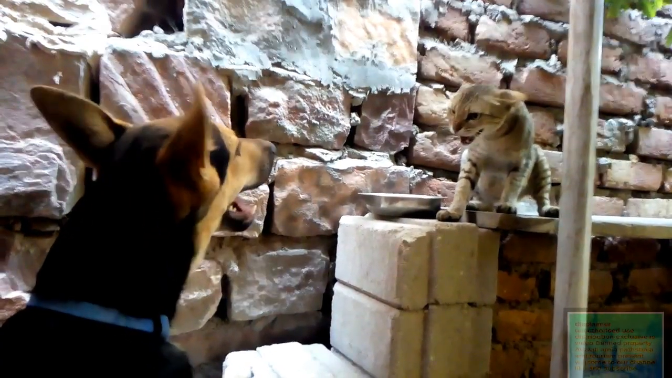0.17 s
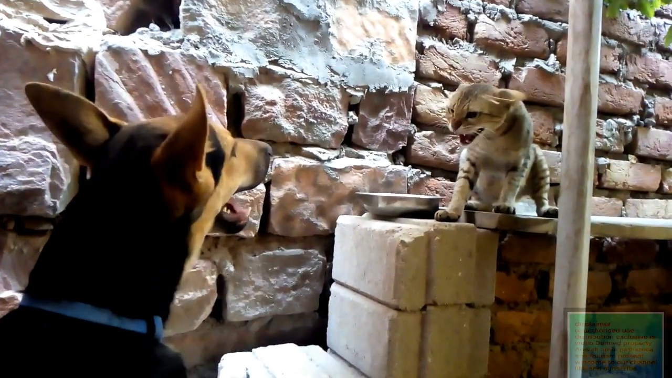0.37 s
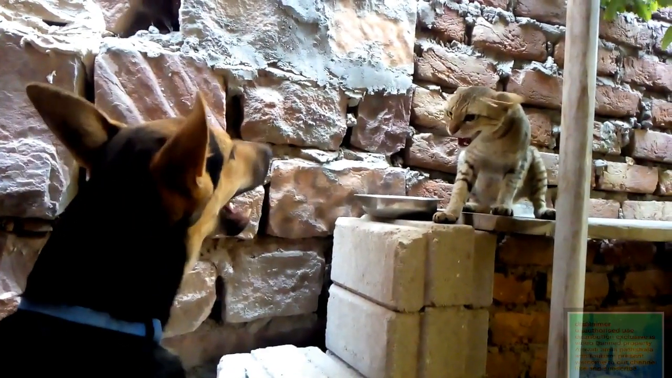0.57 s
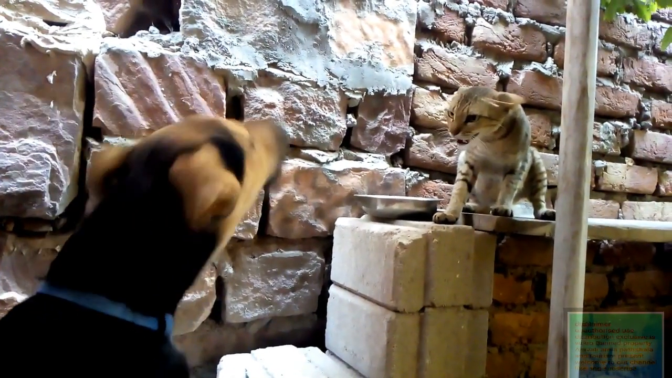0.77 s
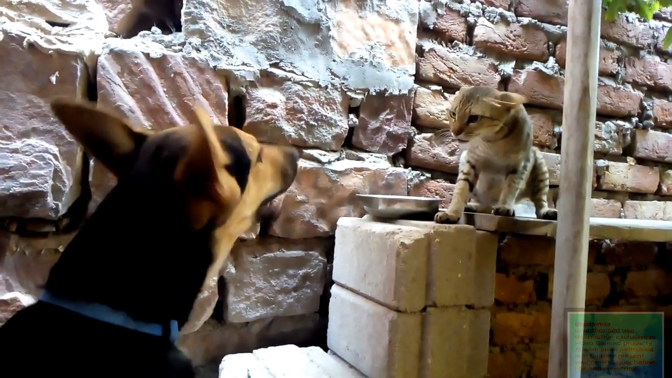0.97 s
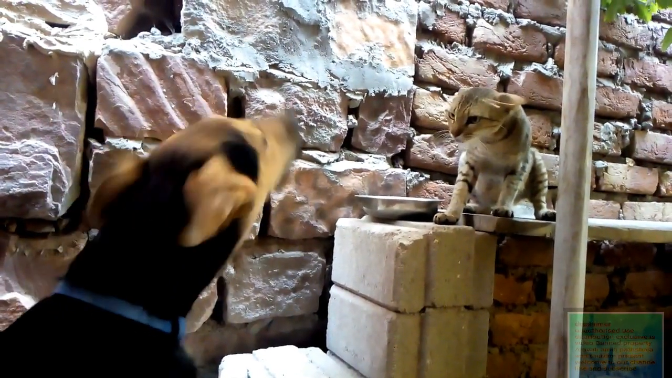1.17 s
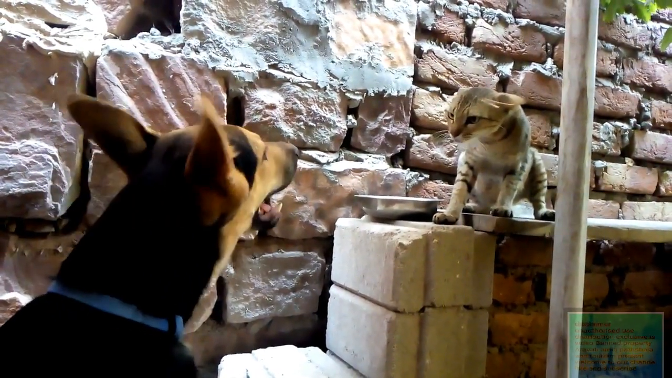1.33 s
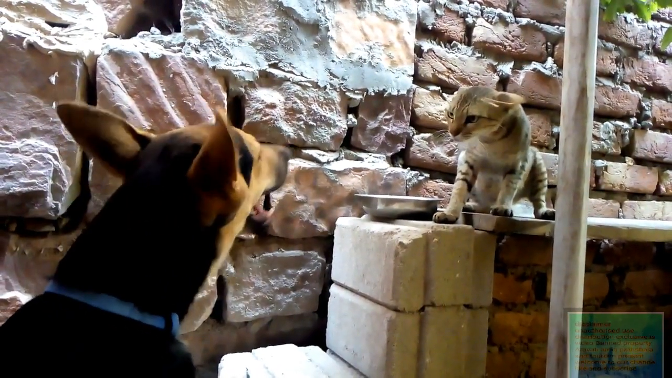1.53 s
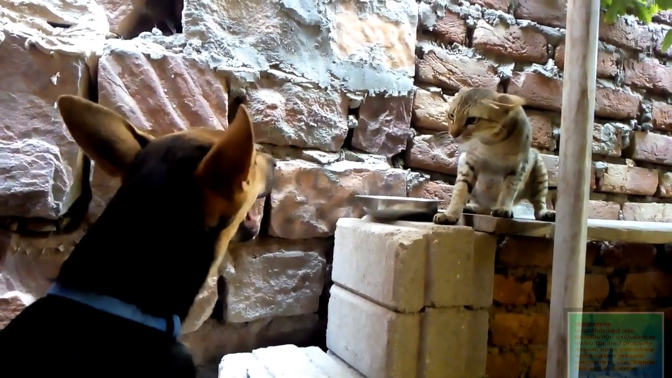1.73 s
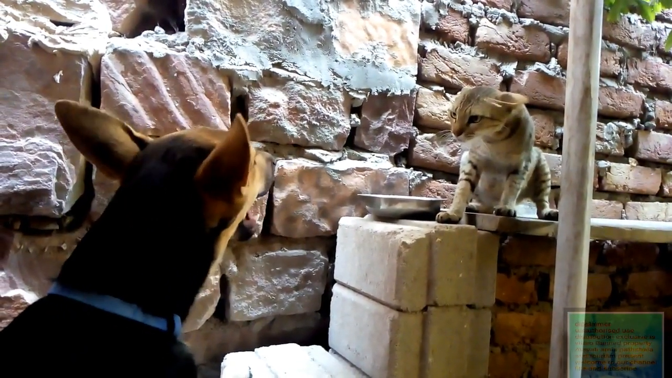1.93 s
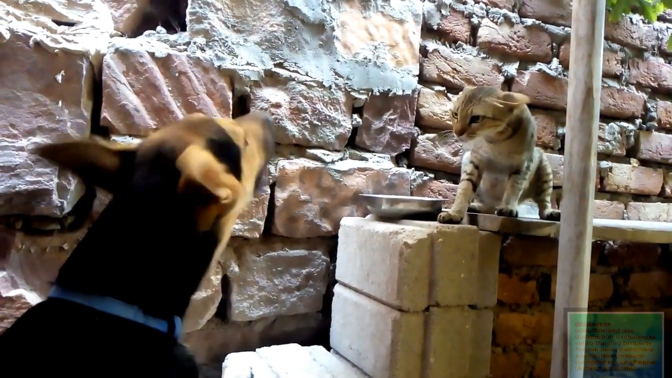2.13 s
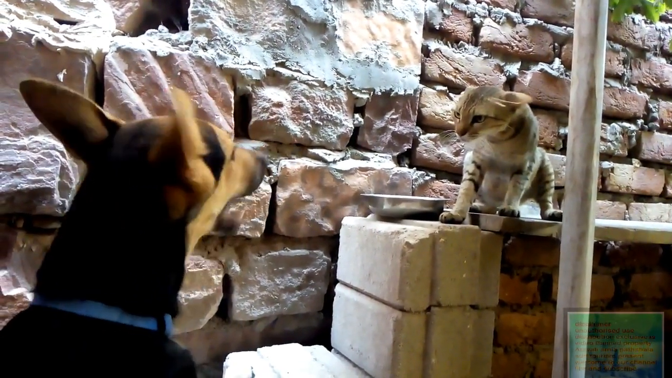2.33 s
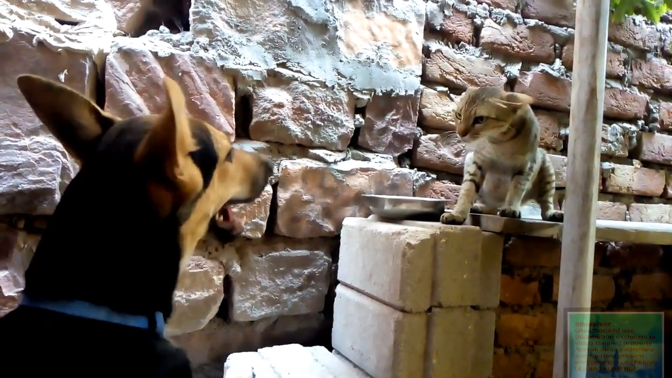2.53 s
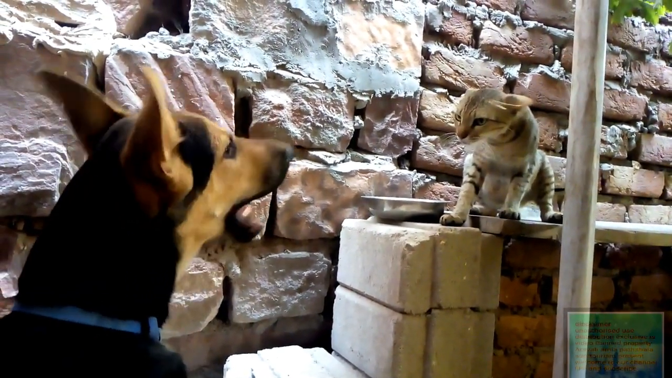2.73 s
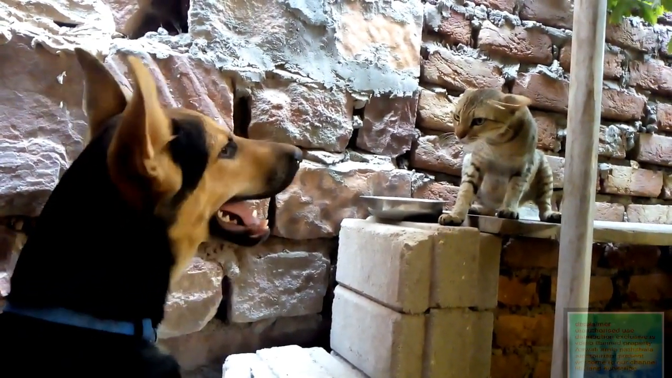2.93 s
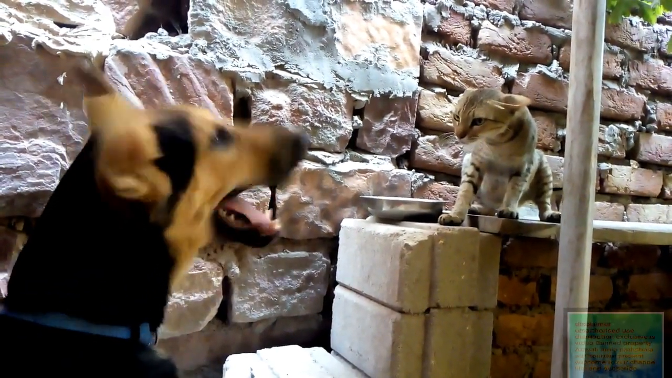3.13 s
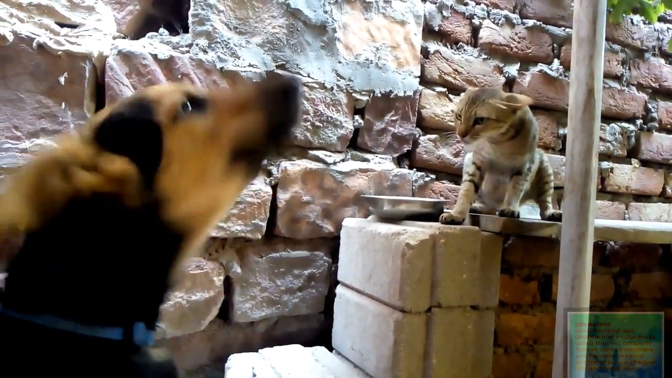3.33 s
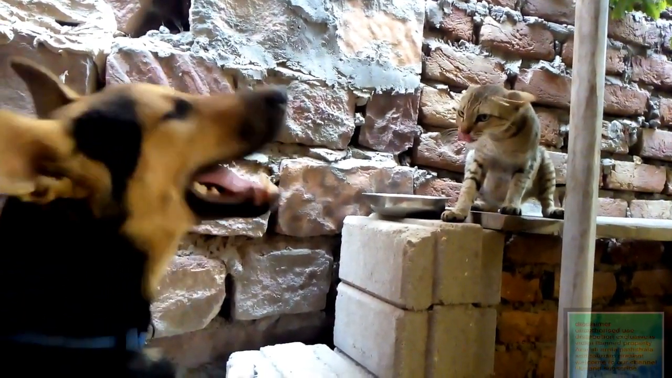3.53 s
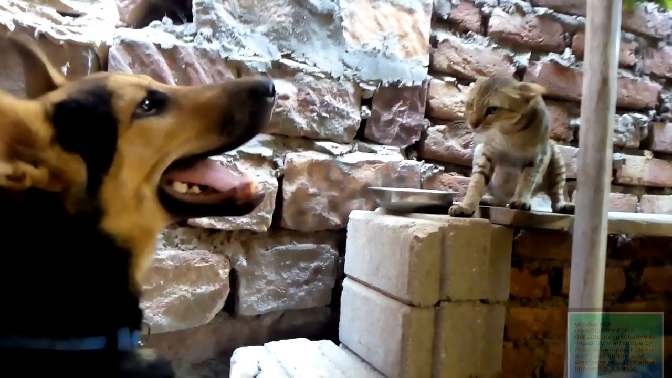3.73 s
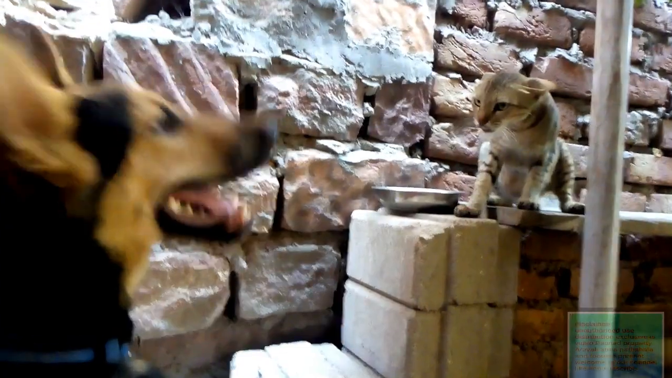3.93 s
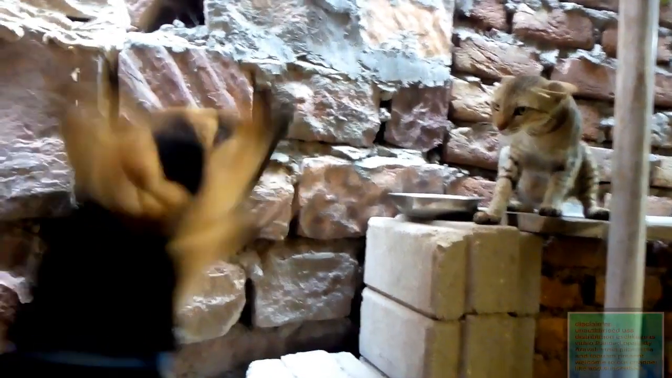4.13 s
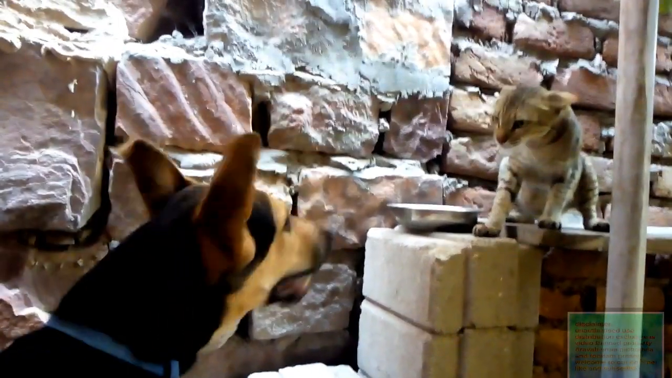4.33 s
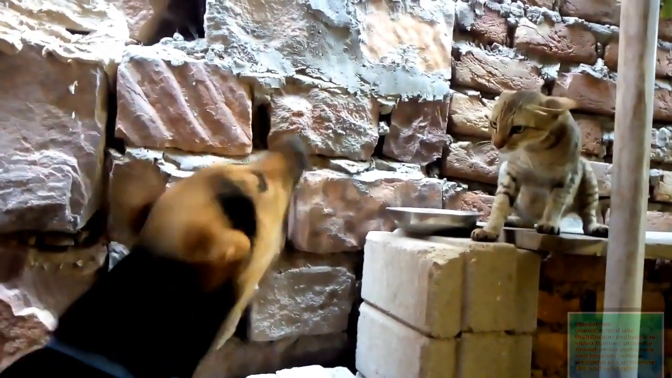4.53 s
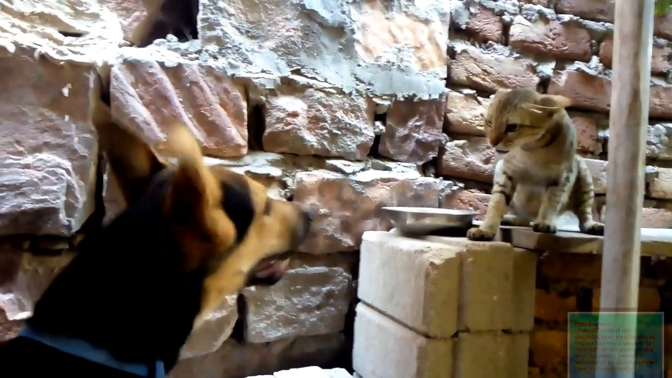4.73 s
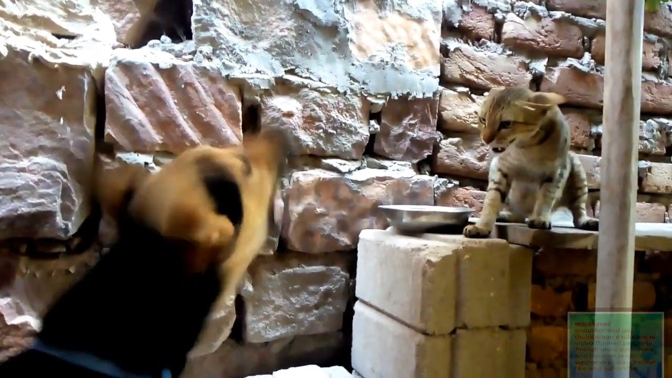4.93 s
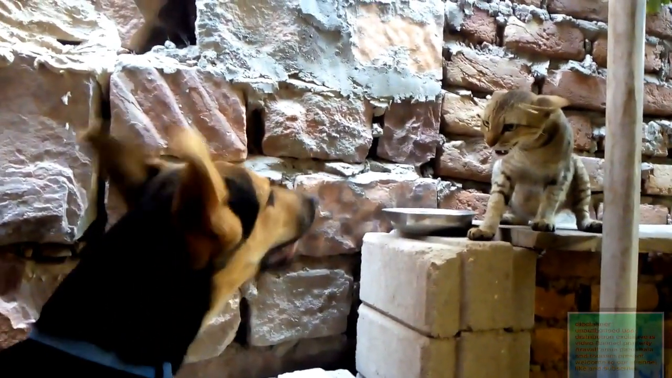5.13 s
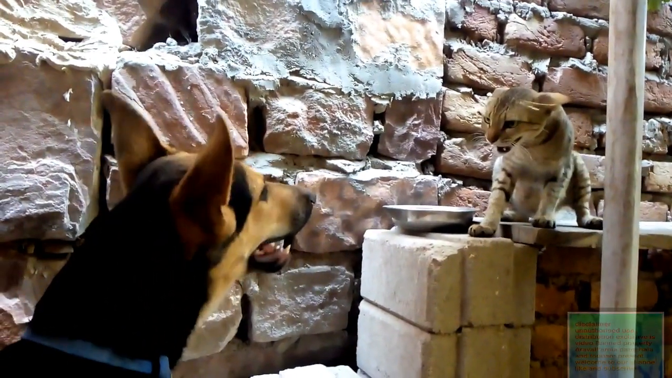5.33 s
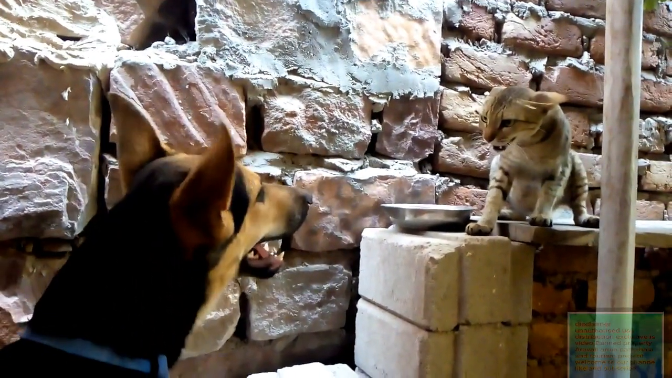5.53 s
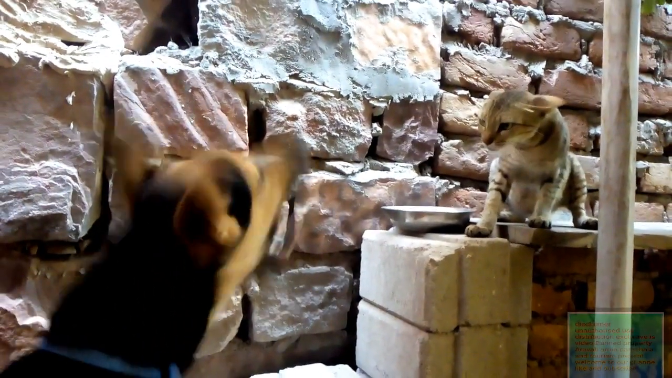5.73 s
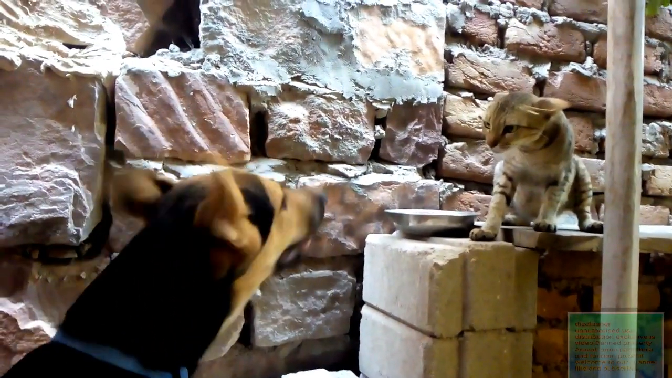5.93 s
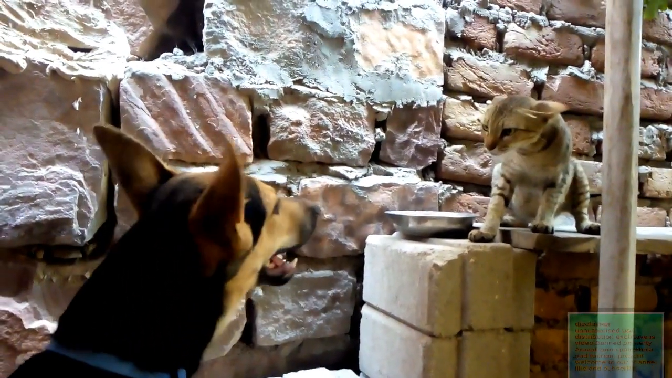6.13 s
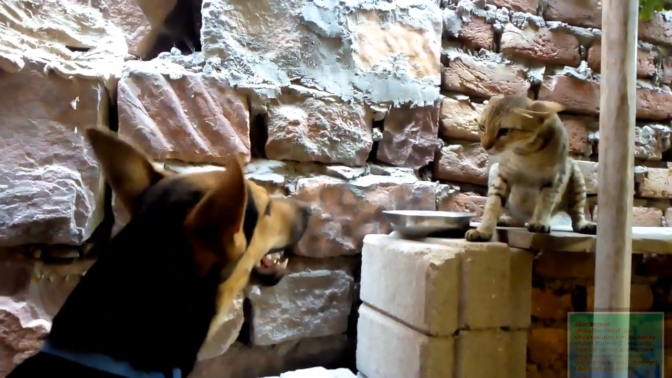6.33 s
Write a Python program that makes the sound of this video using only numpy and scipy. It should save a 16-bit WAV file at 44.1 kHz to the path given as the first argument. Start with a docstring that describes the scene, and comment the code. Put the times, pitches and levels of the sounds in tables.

```python
"""A faint town hum and a panting dog; then the dog barks at a cat in a brick-walled yard.
Each bark is a short cry, clear or hoarse and mostly rising: overtones shaped by mouth and throat.
The walls throw barks back for about a quarter second, as scattered echoes that grow duller.
The cat answers with a thin, drawn-out yowl: clean overtones through a nasal resonance.
Between barks the dog pants in bursts of coloured noise. A limiter holds the loudest barks down."""
import sys
import numpy as np
from scipy import signal
from scipy.fft import rfft, irfft, next_fast_len
from scipy.io import wavfile

SR = 44100
rng = np.random.default_rng(int(sys.argv[2]) if len(sys.argv) > 2 else 0)


def bounce(signal):
    """Save signal as a 16-bit WAV file at the path given by the first command-line argument."""
    frames = np.transpose(np.atleast_2d(signal))
    limited = np.clip(frames, -1, 1)
    pcm = np.round(limited * 32767).astype(np.int16)
    wavfile.write(sys.argv[1], SR, pcm)


def level_to_linear(level):
    """Convert decibel levels to linear amplitude factors, elementwise."""
    exponent = np.asarray(level, float) / 20
    return 10 ** exponent


N = 281358


def curve(rows, at):
    """Columns of a table read at the times given."""
    s, *columns = np.transpose(rows)
    return [np.interp(at, s, column) for column in columns]


def wobble(hz, shape):
    """Low-passed noise of spread 1."""
    noise = signal.sosfilt(signal.butter(2, hz, fs=SR, output="sos"), rng.standard_normal(shape))
    return noise / noise.std()


def peak(hz, centre_hz, width_hz):
    """Gain of one resonance, 1 on top."""
    return 1 / np.sqrt(1 + ((hz ** 2 - centre_hz ** 2) / (hz * width_hz)) ** 2)


def coloured(spectrum, alike):
    """Stereo noise with the given spectrum, partly shared by both sides; rms 1."""
    size = next_fast_len(N, True)
    hz = np.fft.rfftfreq(size, 1 / SR) + 1
    white = rng.standard_normal((3, size))
    shared, separate = white[0], white[1:]
    sides = np.sqrt(np.clip(alike, 0, 1)) * shared + np.sqrt(np.clip(1 - alike, 0, 1)) * separate
    points = np.array(spectrum)
    gain = level_to_linear(np.interp(np.log(hz), np.log(points[:, 0]), points[:, 1]))
    out = irfft(rfft(sides) * gain, size)[:, :N]
    return out / out.std()


def spans(tables, edge_s):
    """Sample range, fade and columns for each table; a sound cut by the end does not fade out."""
    for rows in tables:
        at = np.arange(round(rows[0][0] * SR), min(N, round(rows[-1][0] * SR)))
        since_start = at - at[0]
        until_end = at[-1] - at + (at[-1] == N - 1) * SR
        fade = np.clip(np.minimum(since_start, until_end) / (edge_s * SR), 0, 1)
        yield at, fade, curve(rows, at / SR)


def town_hum():
    """Steady coloured noise, nearly the same on both sides, drifting slowly in level."""
    # tone of the hum: frequency_hz, relative density_db (per Hz)
    hum_spectrum = [(15, -32.5), (25, -12.5), (75, 7), (383, -7.5), (573, -7), (1000, -22), (2240, -23),
                    (3440, -43.5), (6200, -32.5), (9520, -41), (15000, -44)]
    # drift of the hum: time_s, level_db
    hum_drift = [(0.0, -58.5), (1.0, -54.5), (1.8, -61.5), (3.9, -62.5), (4.85, -54), (5.4, -63),
                 (6.38, -59.5)]
    level_db, = curve(hum_drift, np.arange(N) / SR)
    return level_to_linear(level_db) * coloured(hum_spectrum, alike=0.93)


def panting():
    """Air rushes and flutters through the open mouth; hiss swells late as the mouth narrows."""
    # breaths: start_s, length_s, level_db at the start, hiss_db over the teeth
    pants = [(0.064, 0.5, -60.5, -70.5), (1.658, 0.29, -62.5, -92), (2.347, 0.13, -65.5, -86),
             (3.755, .17, -62.5, -66), (5.367, .24, -62.5, -92), (6.351, .1, -55.5, -79.5)]
    # tone of the air: frequency_hz, relative density_db (per Hz)
    breath_spectrum = [(180, -42.5), (300, 2), (629, 4.5), (746, 8), (1030, 0.5), (2200, -1), (3940, -13.5),
                       (6580, -22.5), (9000, -27), (11700, -64), (19800, -120)]
    # tone of the hiss over the teeth: frequency_hz, relative density_db (per Hz)
    teeth_spectrum = [(2500, -31), (4000, -3), (6500, 1), (9000, -15.5), (16000, -52)]
    attack_s, release_s, sag_db_per_s = 0.0083, 0.042, 1.5
    air = coloured(breath_spectrum, alike=0.071) * level_to_linear(1.8 * wobble(22, N))
    hiss = coloured(teeth_spectrum, alike=0.28)
    effort, narrowing = 0, 0
    for start_s, length_s, level_db, hiss_db in pants:
        t = np.arange(N) / SR - start_s
        edges = np.clip(np.minimum(t / attack_s, (length_s - t) / release_s), 0, 1)
        effort = effort + level_to_linear(level_db - sag_db_per_s * t) * edges
        narrowing = narrowing + level_to_linear(hiss_db) * np.sin(np.pi * np.clip(t / length_s, 0, 1) ** 1.6) ** 2
    return air * effort + hiss * narrowing


def tract(hz, mouth_hz, upper_db, shorten, mouth_db=0):
    """Power gain of mouth and throat resonances."""
    # upper resonances of the dog's throat: centre_hz and width_hz (centre before shortening), level_db
    throat_peaks = [(1226, 570, -4.5), (2048, 410, -4), (2440, 150, -4.5), (2670, 180, -16),
                    (4500, 920, -35), (6200, 2100, -33.5)]
    power = level_to_linear(2 * mouth_db) * peak(hz, mouth_hz, width_hz=250) ** 4
    for centre_hz, width_hz, level_db in throat_peaks:
        gain = level_to_linear(level_db + upper_db) * peak(hz, centre_hz * shorten, width_hz) ** 2.36
        power = power + gain ** 2
    return power


def dog():
    """Vocal folds feed overtones to the tract; hoarseness shakes pitch, smears them and adds rasp."""
    # each bark's cry: time_s, pitch_hz, level_db
    barks = [
        [(.52, 424.6, -49), (.538, 445.8, -18.5), (.56, 589.3, -12), (.58, 736.1, -9), (.6, 756.8, 5),
         (.615, 707.7, 6.5), (.655, 640, -3), (.668, 656, -44)],
        [(.942, 428.3, -47.5), (.96, 438.5, -17.5), (.98, 602.3, -11), (1.0, 633, -6), (1.02, 664.7, 6.5),
         (1.055, 638, 6), (1.07, 596, -3.5), (1.085, 532, -14)],
        [(1.968, 430.8, -42), (1.985, 442.8, -11.5), (2.005, 509.5, -22.5), (2.025, 636, -15),
         (2.045, 609, -12.5), (2.06, 457.7, -21), (2.08, 390.2, -17), (2.11, 309.7, -25), (2.15, 278.1, -25.5),
         (2.165, 128.6, -33.5), (2.24, 120.4, -57.5), (2.33, 128, -77)],
        [(2.6, 369, -41.5), (2.617, 389.1, -22), (2.645, 399.6, -22.5), (2.67, 402, -25.5),
         (2.69, 378.7, -21.5), (2.715, 336, -46)],
        [(3.068, 425, -30), (3.082, 434.3, -21.5), (3.097, 469.6, -8.5), (3.112, 577.4, -23.5),
         (3.13, 776, -6.5), (3.155, 804.7, 10.5), (3.177, 774, 8), (3.195, 728.3, 7.8), (3.215, 720, -46)],
        [(4.028, 463.7, -39), (4.05, 463, -8), (4.07, 448.2, -16), (4.09, 469.3, 3.5), (4.105, 509.5, 2.1),
         (4.112, 638.8, 6.5), (4.14, 753.2, 1.5), (4.165, 728, -40)],
        [(4.402, 292.1, -30), (4.427, 335.2, -13.5), (4.45, 411.5, -16.5), (4.474, 506.5, 0),
         (4.484, 637.2, 1.2), (4.5, 633.8, 0.3), (4.515, 661.3, -2), (4.535, 604, -53.5)],
        [(4.806, 275, -33.5), (4.825, 314.3, -12.5), (4.85, 391.3, -16), (4.875, 488.4, -10),
         (4.888, 665.3, -10.5), (4.915, 654.5, 0), (4.94, 612, -5.5), (4.955, 620, -44)],
        [(5.622, 402, -47.5), (5.635, 432.9, -16.5), (5.652, 526, -15), (5.67, 715.4, -11), (5.7, 764.4, -3.2),
         (5.725, 715, 4), (5.745, 652.3, 0.5), (5.765, 619, -5)],
    ]
    # each bark's mouth: resonance_hz as it opens, resonance_hz once open, upper resonances_db,
    # factor on the upper resonances' pitch as the throat changes length
    voices = [(540, 725, -7.5, 1.01), (500, 530, -9, 1.032), (815, 810, -9, 1.008), (1146, 590, -9.5, .97),
              (926, 790, -6, 1.1), (920, 700, -6.5, 1.013), (667, 640, -1.5, 1.014), (620, 650, -5, 1.012),
              (560, 725, -6.5, 1.03)]
    # hoarseness of each bark (0-1), before the gain at its end
    hoarseness = [.42, .04, .3, .12, .06, .5, .45, .45, .42]
    clear_share, break_share = 0.3, 0.18   # of a bark: its clearest part, then the voice breaking up
    jaw_share = 0.33   # of a bark, taken to open the mouth
    hoarse_gain_at_end = 0.21   # added as the air runs out
    open_swell_db = 4   # upper resonances swell in mid-bark, with the jaw widest
    rasp_db, rasp_mouth_db = 2, -5   # turbulent air, and how much less of it rings in the mouth
    out, order = np.zeros(N), np.arange(1, 25)[:, None]
    cries = spans(barks, edge_s=0.0024)
    for (at, fade, (pitch, db)), voice, hoarse in zip(cries, voices, hoarseness):
        shut_hz, open_hz, bright_db, shorten = voice
        progress = (at - at[0]) / at.size
        breaking = np.clip((progress - clear_share) / break_share, 0.3, 1)
        rough = np.clip(hoarse * breaking + hoarse_gain_at_end * progress ** 5.0, 0, 1)

        mouth_hz = shut_hz + (open_hz - shut_hz) * np.clip(progress / jaw_share, 0, 1)
        mouth_hz = np.minimum(mouth_hz, 2.1 * pitch)   # a sinking voice drags the resonance down
        upper_db = bright_db + open_swell_db * np.sin(np.pi * progress)
        phase = 2 * np.pi * np.cumsum(pitch * (1 + 0.071 * rough * wobble(140, at.size))) / SR
        hz = order * pitch

        # the fundamental also leaves through the chest, most when deep
        chest = level_to_linear(-33.5) * (0.77 + (230 / pitch) ** 6) * (order == 1)
        power = tract(hz, mouth_hz, upper_db, shorten) + chest
        # softer barks are duller
        power = power * level_to_linear(0.82 * np.minimum(db + 2.5, 0) * np.log2(np.maximum(hz / 2800, 1)))
        # level_db sets the whole stack, before its top is rolled off
        gain = np.sqrt(power / power.sum(axis=0)) * (hz < 15600) / (1 + (hz / 9000) ** 2.0)

        air_hz = np.fft.rfftfreq(at.size, 1 / SR) + 1
        air_gain = np.sqrt(tract(air_hz, open_hz, bright_db, shorten, rasp_mouth_db))
        air_gain = air_gain / (1 + (air_hz / 8000) ** 2)
        rasp = irfft(rfft(rng.standard_normal(at.size)) * air_gain, at.size)
        rasp = level_to_linear(rasp_db) * rough * rasp / rasp.std()

        flutter = wobble(150, (2, order.size, at.size)) / np.sqrt(2)
        smear = np.clip(rough * (hz / 1000) ** 0.48, 0, 1)   # higher overtones smear more
        steady = np.sqrt(1 - smear ** 2)
        angle = order * phase + order ** 2 / 3   # the throat delays each overtone differently
        tones = (steady + smear * flutter[0]) * np.sin(angle) + smear * flutter[1] * np.cos(angle)
        out[at] += level_to_linear(db) * fade * (np.sqrt(2) * (gain * tones).sum(axis=0) + rasp)
    return out


def yard(x):
    """Scattered echoes off near and far walls, different on each side, duller the later they come."""
    # echoes of the yard: delay_s, energy_db (per s, before dulling), dulling_hz
    echo_decay = [(.003, 18, 9200), (.05, 7, 7100), (.12, -1, 5200), (.25, -23.5, 3500), (.33, -39.5, 3120),
                  (.7, -71, 2500)]
    delay_s = np.arange(round(echo_decay[-1][0] * SR)) / SR
    db, dull_hz = curve(echo_decay, delay_s)
    clumps = level_to_linear(3.0 * wobble(60, (2, delay_s.size)))
    hits = rng.standard_normal((2, delay_s.size)) * clumps
    echoes, edges_hz = 0, 100 * 2 ** np.arange(0, 7.5, 0.5)   # half-octave bands
    for low, high in zip(edges_hz, edges_hz[1:]):
        band = signal.sosfilt(signal.butter(2, [low, high], "band", fs=SR, output="sos"), hits)
        echoes = echoes + band / (1 + (low / dull_hz) ** 2.9)
    echoes = echoes * level_to_linear(db) * (delay_s > echo_decay[0][0]) / np.sqrt(SR)
    return signal.fftconvolve(x[None], echoes, axes=1)[:, :N]


def smacks():
    """A dull wet click as the mouth opens: low-passed noise dying away in milliseconds."""
    # lips part: start_s, level_db at the start
    lip_clicks = [(0.949, -32), (1.97, -30.5), (3.071, -32), (4.031, -26), (5.61, -37.5)]
    decay_s = 0.004
    out, at = np.zeros(N), np.arange(600)
    noises = wobble(1100, (len(lip_clicks), at.size))
    for (start_s, db), noise in zip(lip_clicks, noises):
        out[round(start_s * SR) + at] = level_to_linear(db) * noise * np.exp(-at / SR / decay_s)
    return out


def cat():
    """Overtones on a gliding pitch stand out at the nasal resonance; low notes throb into a growl."""
    # the cat's yowls: time_s, pitch_hz, level_db (of the fundamental, before ring and throb)
    yowls = [
        [(1.28, 533, -64), (1.44, 543, -59), (1.52, 551, -62), (1.64, 560, -50.5), (1.76, 576, -53),
         (1.9, 585.6, -51.5), (1.97, 585, -51.5), (2.2, 524, -53), (2.3, 493.6, -53), (2.38, 488, -57.5),
         (2.58, 478.5, -55), (2.72, 430, -46.5), (2.87, 435, -47), (3.1, 441, -44.5)],
        [(5.98, 574, -58.5), (6.18, 575, -56.5), (6.26, 586, -49.5), (6.32, 583, -53.5), (6.38, 602, -41.5)],
    ]
    # overtones: multiple of the pitch, level_db
    overtones = [(1, 0), (2, -21), (3, -31), (4, -38), (5, -32), (6, -43), (7, -42), (8, -44), (9, -46),
                 (10, -50)]
    # nasal resonance: centre_hz, width_hz
    nose = (4020, 220)
    # each yowl: nasal ring_db, overtones_db
    cat_mouths = [(24, 1.9), (10.13, -7)]
    growl_hz, growl_below_hz, growl_depth = 47.8, 462, 0.2
    ring_loss_per_db = 0.6   # louder notes leave by the mouth, so the nasal ring recedes
    lean_db = -4 * np.array([[0.5], [-0.5]])   # 4 dB towards the right
    out = np.zeros((2, N))
    for (at, fade, (pitch, db)), (nose_db, tone_db) in zip(spans(yowls, edge_s=0.013), cat_mouths):
        ring_db = nose_db - ring_loss_per_db * np.maximum(db - db.mean(), 0)
        phase = 2 * np.pi * np.cumsum(pitch * (1 + 0.0015 * wobble(15, at.size))) / SR
        # higher notes come with a wider mouth and stronger overtones
        open_db = tone_db + 14.0 * np.log2(pitch / 440)
        voice = 0
        for k, level_db in overtones:
            strength = level_to_linear(level_db + (k > 1) * open_db + 1.5 * wobble(11, at.size))
            ring = 1 + level_to_linear(ring_db) * peak(k * pitch, *nose) ** 3
            voice = voice + strength * ring * np.sin(round(k) * phase)
        growl = growl_depth * np.clip((growl_below_hz - pitch) / 15, 0, 1)
        beat = 2 * np.pi * np.cumsum(growl_hz * (1 + 0.032 * wobble(5.4, at.size))) / SR
        throb = 1 + growl * (np.sin(beat) + 0.48 * np.cos(2 * beat))
        out[:, at] += np.sqrt(2) * level_to_linear(db) * fade * throb * voice * level_to_linear(lean_db)
    return out


def limiter(x, ceiling_db, release_db_per_s, attack_s):
    """Gain falls fast on peaks over the ceiling and climbs back steadily, so loud barks' echoes hang."""
    ramp = release_db_per_s * np.arange(N) / SR
    over_db = np.maximum(20 * np.log10(np.abs(x).max(axis=0) + 1e-9) - ceiling_db, 0)
    held_db = np.maximum.accumulate(over_db + ramp) - ramp
    r = np.exp(-1 / (attack_s * SR))
    return x * level_to_linear(-signal.lfilter([1 - r], [1, -r], held_db))


def scene():
    """The barks reach the left port a moment early; hum and breath lie beneath."""
    barks, yowl = dog() + smacks(), cat()
    right_lag = 7.0   # samples
    late_barks = np.interp(np.arange(N) - right_lag, np.arange(N), barks)
    direct = level_to_linear(-2.56) * np.stack([barks, late_barks])
    cat_echo = yard(level_to_linear(-6) * yowl.mean(axis=0))   # the cat stirs the yard less than the dog
    return direct + yard(barks) + yowl + cat_echo + panting() + town_hum()


def top_cut(x):
    """Nothing passes above the cut-off."""
    return signal.sosfilt(signal.butter(12, 15800, fs=SR, output="sos"), x)


def record(dry):
    """Unequal ports, limiter, then a slightly lopsided overload that adds fizz and a low thump."""
    # balance of the two microphone ports: frequency_hz, left minus right_db
    port_balance = [(60, -3), (150, -6.5), (300, -6), (600, -3.5), (1500, -5), (3000, -3.5), (5000, 1),
                    (9000, 8), (14000, -8)]
    points, hz = np.array(port_balance), np.fft.rfftfreq(N, 1 / SR) + 1
    lean_db = np.interp(np.log(hz), np.log(points[:, 0] + 1), points[:, 1])
    ports = irfft(rfft(dry) * level_to_linear(np.outer([0.5, -0.5], lean_db)), N)
    held = limiter(ports, ceiling_db=-1.0, release_db_per_s=96.0, attack_s=0.0013)
    top = 0.66   # where the overload flattens out
    bent = top * np.tanh((np.abs(held) / top) ** 2.962) ** (1 / 2.852) * np.sign(held)
    bent = bent + 0.072 * held ** 2   # the lopsided part
    bent = signal.sosfilt(signal.butter(1, 30, "high", fs=SR, output="sos"), bent)
    bent = signal.sosfilt(signal.cheby2(10, 40, 15800, fs=SR, output="sos"), bent)
    return top_cut(bent)


dry = scene()
out = record(dry)
bounce(out)
```